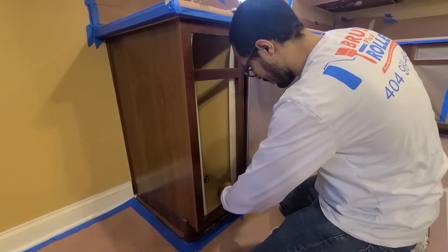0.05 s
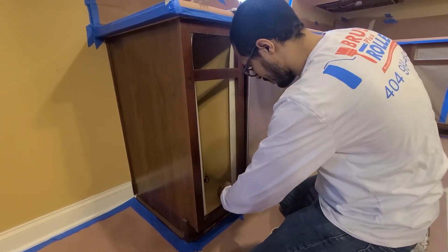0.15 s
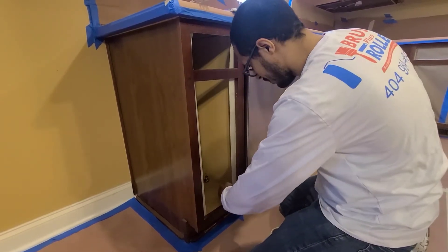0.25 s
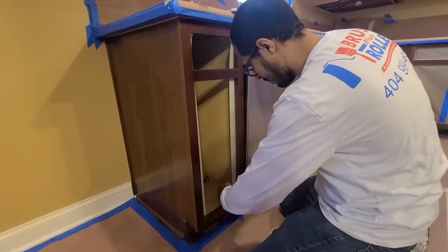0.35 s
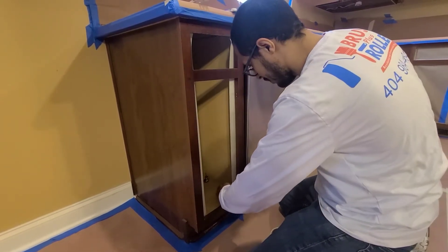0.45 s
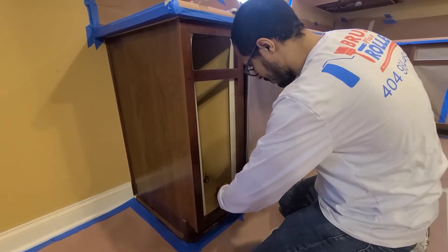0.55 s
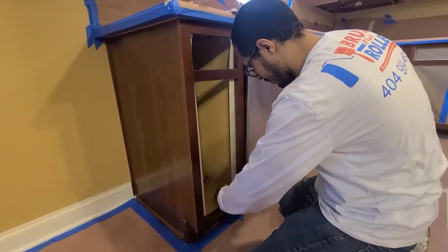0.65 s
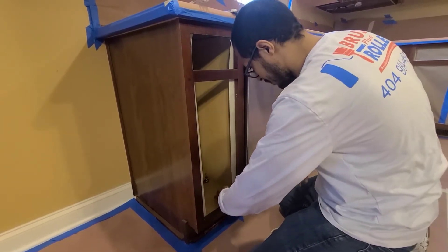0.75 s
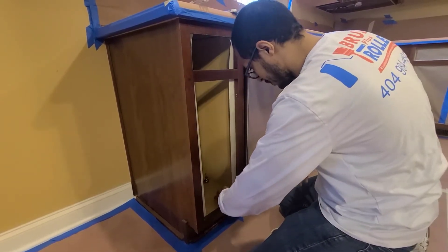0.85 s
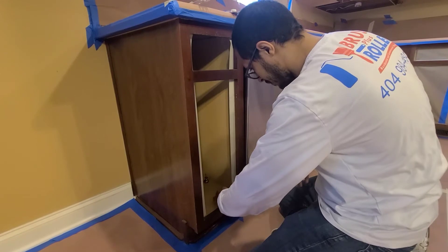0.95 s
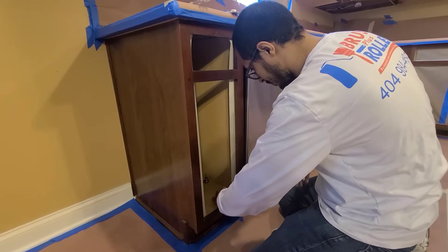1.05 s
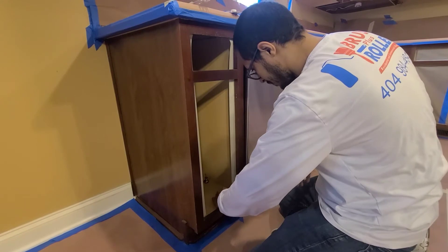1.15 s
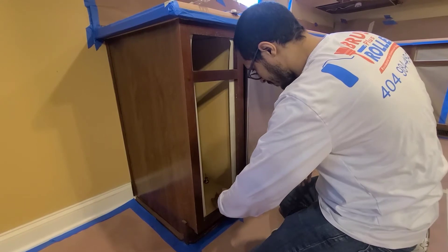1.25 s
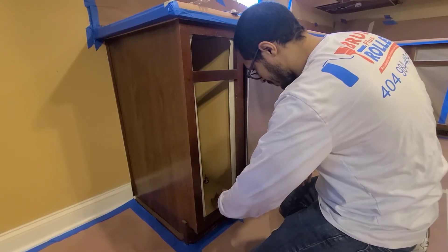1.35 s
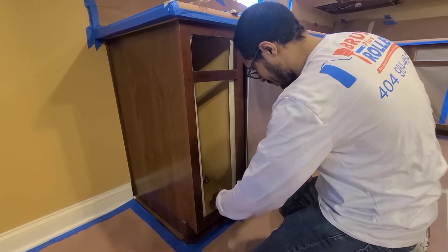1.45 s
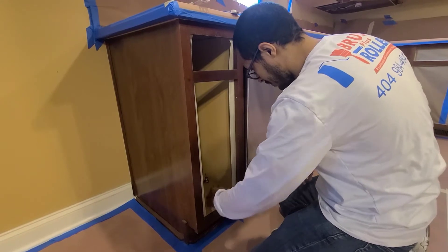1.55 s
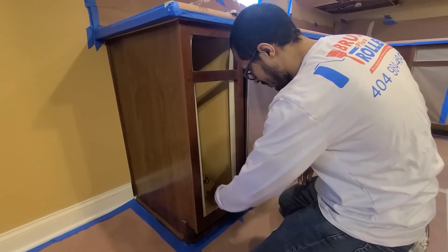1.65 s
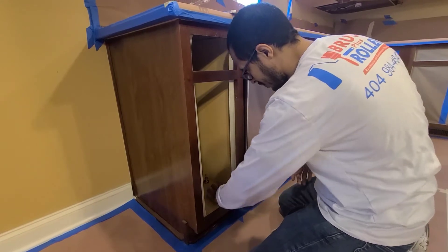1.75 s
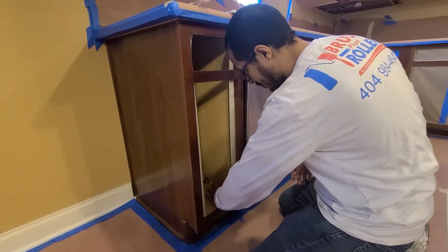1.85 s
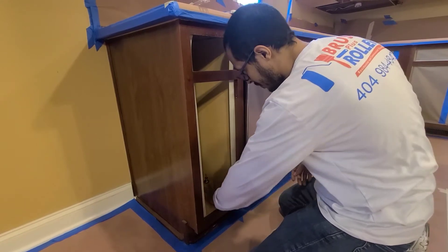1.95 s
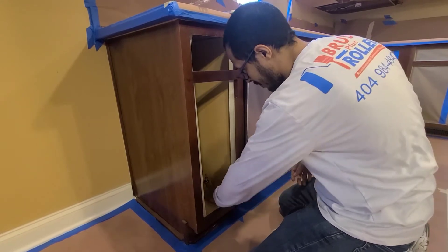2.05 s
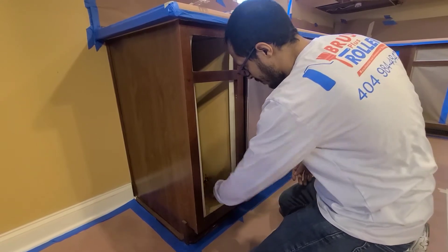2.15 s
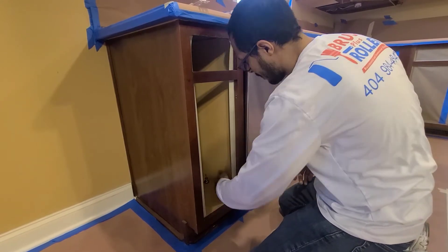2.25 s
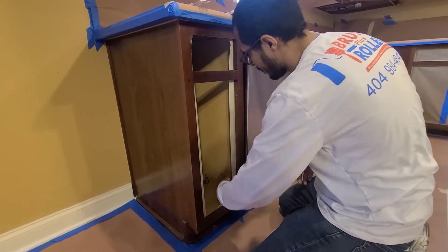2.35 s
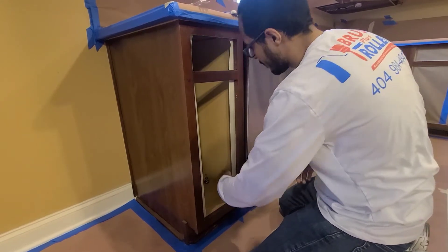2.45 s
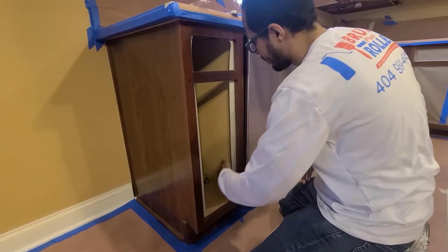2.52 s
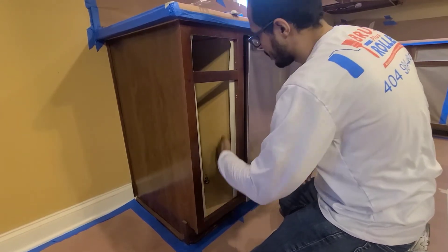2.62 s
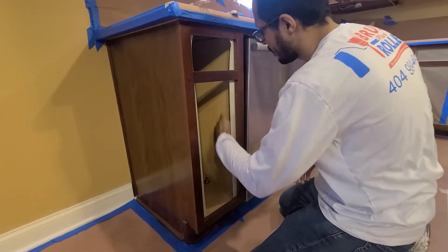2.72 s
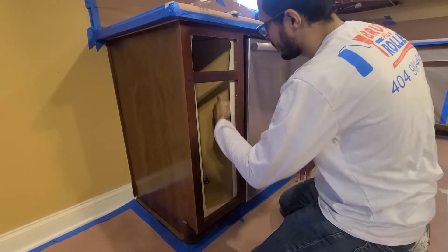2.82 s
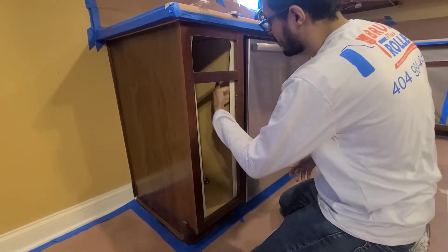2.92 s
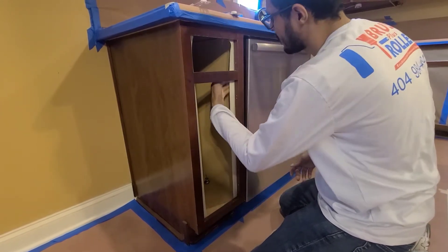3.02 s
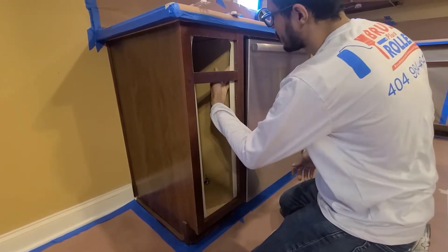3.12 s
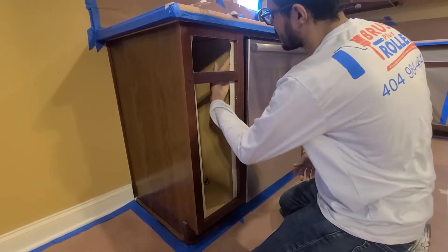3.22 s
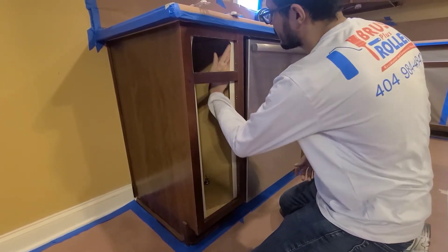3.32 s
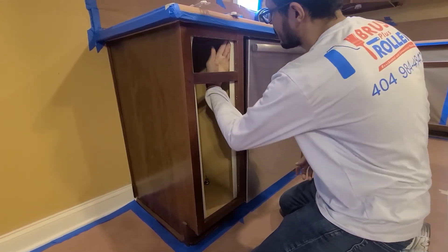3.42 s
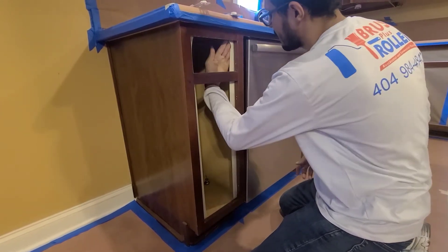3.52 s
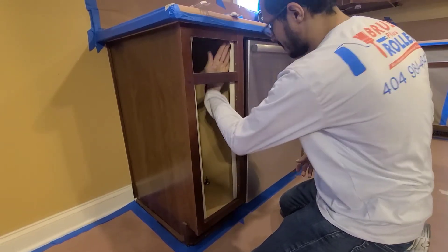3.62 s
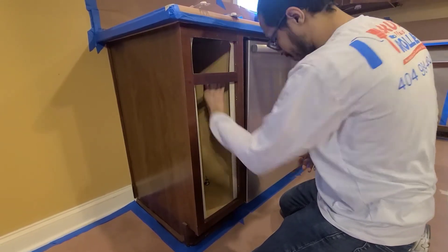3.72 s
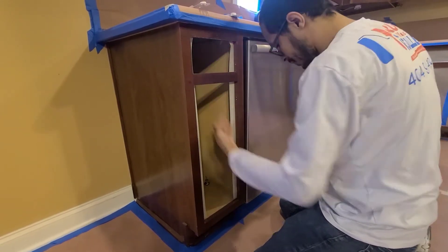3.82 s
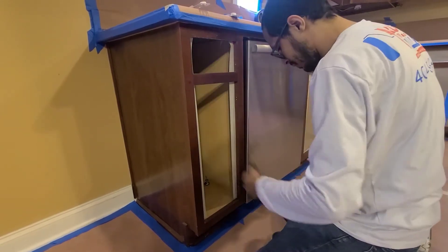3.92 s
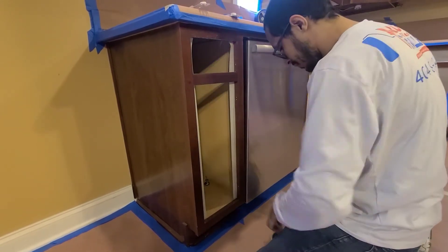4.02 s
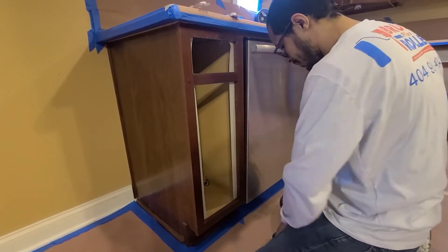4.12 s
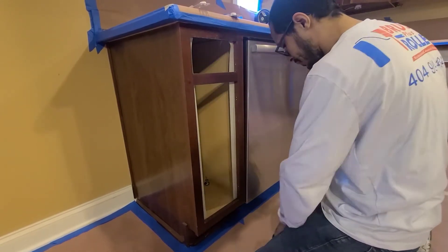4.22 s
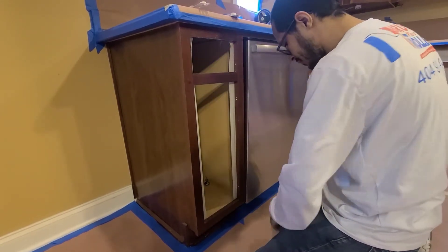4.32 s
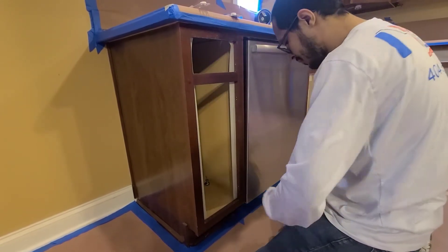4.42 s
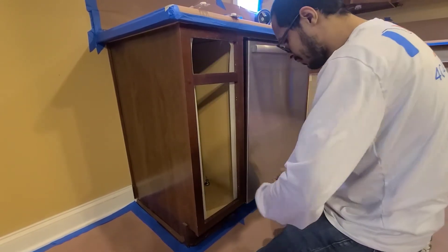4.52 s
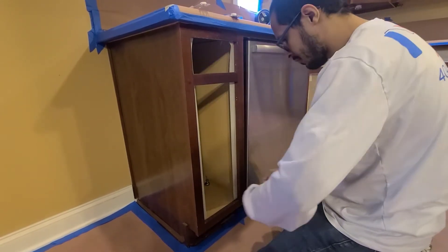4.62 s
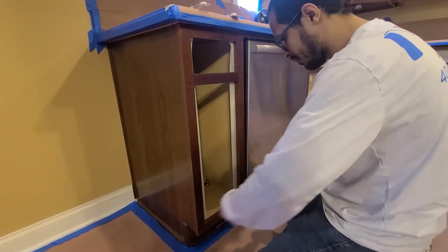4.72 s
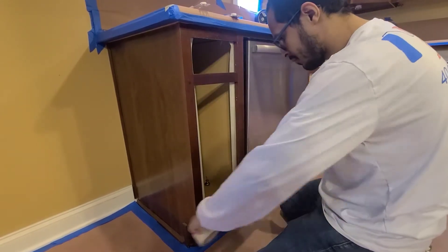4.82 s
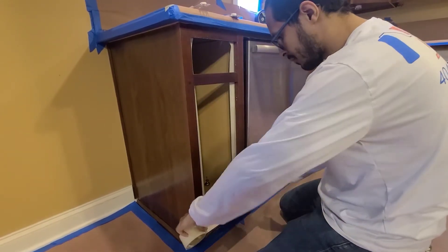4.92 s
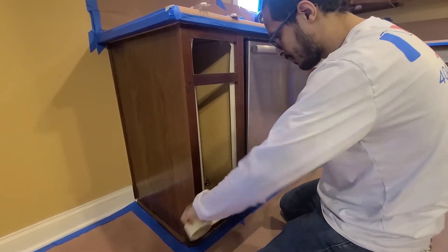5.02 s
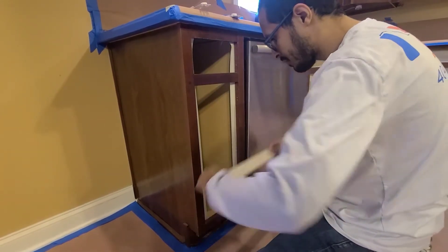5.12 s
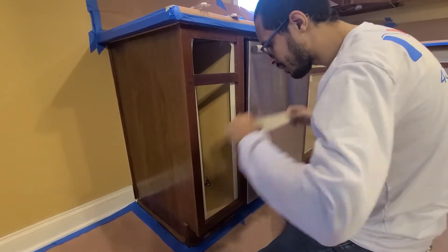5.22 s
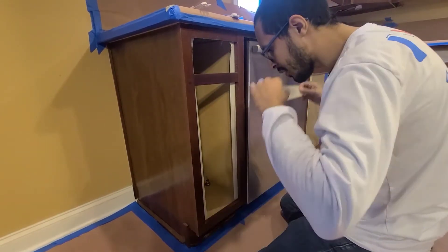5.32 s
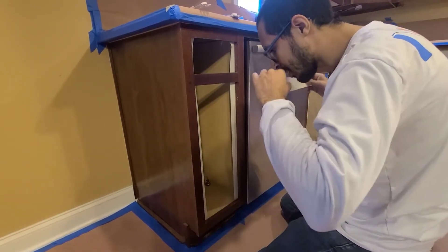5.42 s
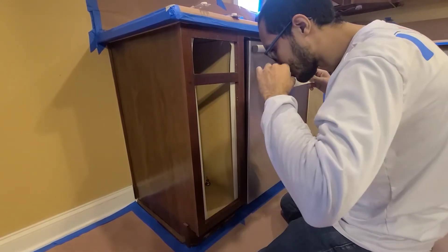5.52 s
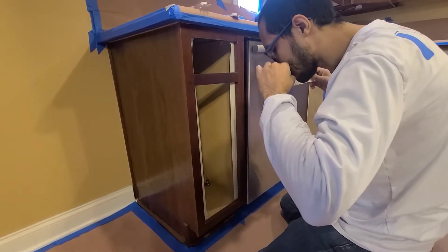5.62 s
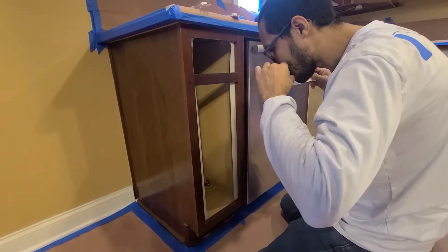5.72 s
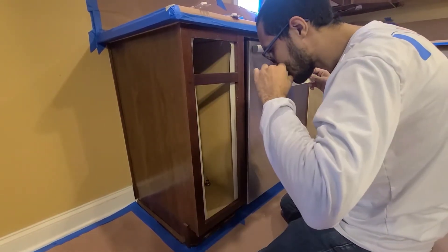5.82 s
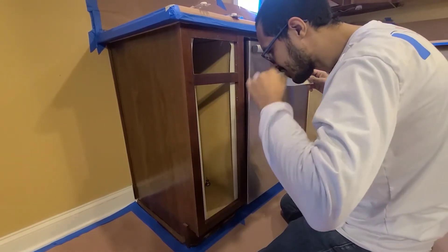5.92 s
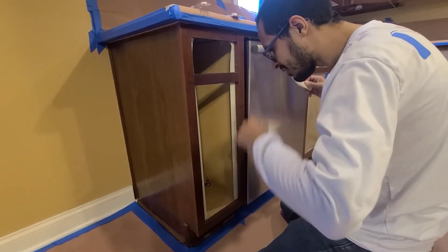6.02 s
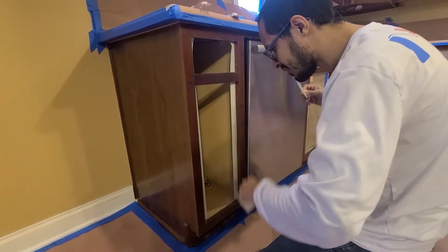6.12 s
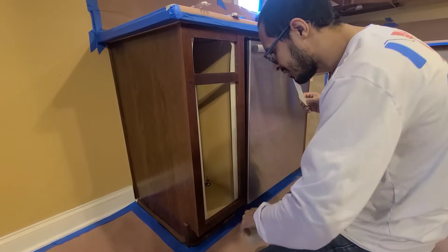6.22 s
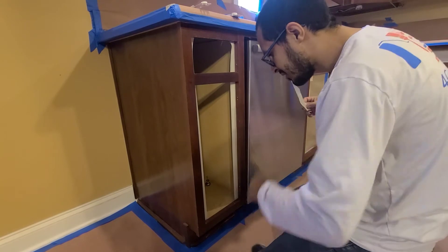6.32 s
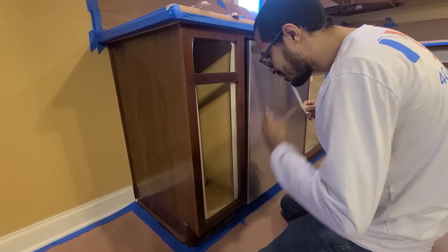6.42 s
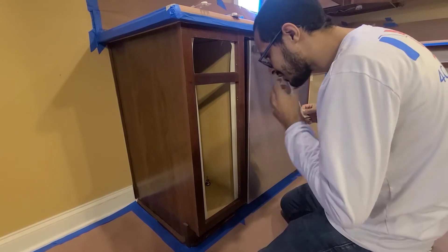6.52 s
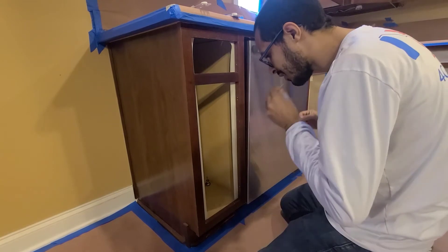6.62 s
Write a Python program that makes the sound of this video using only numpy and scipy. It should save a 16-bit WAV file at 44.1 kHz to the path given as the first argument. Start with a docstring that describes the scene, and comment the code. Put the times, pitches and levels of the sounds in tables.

```python
"""Masking tape is pulled off its roll and torn: uneven stick-slip clicks, each a short scrape, shake the strip.
Before that a kneeling painter presses and smooths tape inside a wooden cabinet: grainy friction noise, gliding
squeaks, bright snaps and dull thuds of decaying noise. At the end the roll drops on a papered floor and bounces:
ringing modes, a paper slap and a floor thump. The bare room echoes by convolution with decaying noise;
a machine hums behind a wall as two wavering tones in faint air noise."""
import sys
import numpy as np
from scipy import signal
from scipy.fft import rfft, irfft, next_fast_len
from scipy.io import wavfile
from scipy.ndimage import uniform_filter1d, minimum_filter1d, map_coordinates

SR = 44100
rng = np.random.default_rng(int(sys.argv[2]) if len(sys.argv) > 2 else 0)


def how_loud(loudness_db):
    """Turn decibels into a plain amplitude multiplier (0 dB gives 1, 20 dB gives 10)."""
    steps = np.asarray(loudness_db, float) / 20
    return 10 ** steps


def unload_audio(sound):
    """Save the sound as a 16-bit wav file, at the path given as the first command line argument."""
    columns = np.transpose(np.atleast_2d(sound))
    # keep every value between -1 and 1, then stretch to whole-number steps
    steps = np.round(np.clip(columns, -1, 1) * 32767)
    wavfile.write(sys.argv[1], SR, steps.astype(np.int16))


N = 293706


def unit(x):
    """Normalization: scales to rms 1."""
    return x / np.sqrt(np.mean(x ** 2) + 1e-20)


def along(points, hz):
    """Logarithmic frequency scale: interpolates (f/Hz, value) points."""
    f, v = np.transpose(points)
    return np.interp(np.log(hz + 1), np.log(f + 1), v)


def curves(rows):
    """Piecewise-linear envelopes: a 0/1 gate with soft edges, open while the rows last, then each column."""
    s, *cols = np.transpose(rows)
    t = np.arange(N) / SR
    is_open = 1. * (t >= s[0]) * (t <= s[-1])
    gate = uniform_filter1d(is_open, size=200, mode="nearest")
    return [gate] + [np.interp(t, s, c) for c in cols]


def wobble(rate):
    """Slow random modulation: a spline through random knots, rate of them a second."""
    return map_coordinates(rng.standard_normal(size=2048), [np.arange(N) * rate / SR])


def coloured(x, points):
    """Minimum-phase filtering: a causal response of energy 1, from the cepstrum of (f/Hz, level/dB) points."""
    half = next_fast_len(N // 2 + 8192)
    hz = np.fft.rfftfreq(2 * half, 1 / SR)
    gain = how_loud(np.maximum(along(points, hz), -90))
    cepstrum = irfft(np.log(unit(gain)), 2 * half)
    # folding the negative times onto the positive ones makes the response causal
    cepstrum[1:half] *= 2
    cepstrum[half + 1:] = 0
    response = np.exp(rfft(cepstrum))
    return irfft(rfft(x, 2 * half) * response, 2 * half)[..., :N]


# coherence of the diffuse sound: f/Hz, left-right likeness/1
LIKENESS = [(60, 0.86), (290, 0.91), (640, 0.43), (1400, 0), (3100, 0), (7000, 0)]


def spread(pair):
    """Diffuse-field coherence: mixes two unrelated signals to agree in the bass and differ in the treble."""
    n = pair.shape[1]
    likeness = np.clip(along(LIKENESS, np.fft.rfftfreq(n, 1 / SR)), 0, 1)
    turn = np.arccos(likeness) / 2
    mid, side = rfft(pair) * [np.cos(turn), np.sin(turn)]
    return irfft(np.array([mid + side, mid - side]), n)


def slips(rate, scatter, size_db):
    """Stick-slip: a click of random size whenever the running rate passes a scattered whole number."""
    draw = rng.standard_normal((N // 16, 2))
    turns = np.arange(len(draw)) + scatter * draw[:, 0]
    at = np.searchsorted(np.cumsum(rate) / SR, turns)
    size = unit(how_loud(size_db * np.clip(draw[:, 1], -2, 2)))
    clicks = np.bincount(at, size, N + 1)[:N]
    return clicks * np.sqrt(SR / np.maximum(rate, 1))  # mean power 1 at any rate


# reverberation of the bare room, before the early scatter is added: f/Hz, t60/s
ECHO_DECAY = [(100, 0.61), (500, 0.51), (1500, 0.57), (4000, 0.46), (8000, 0.38), (15000, 0.25)]
# spectrum of the room's answer, before each source's wet level: f/Hz, level/dB
ECHO_SPECTRUM = [(100, 0), (400, -3.5), (1500, -1.5), (5000, -1), (8000, -6), (15000, -6)]


def room(x, wet_db, close):
    """Reverberation: bare walls answer as frequency-dependent decay; close surfaces add an early scatter."""
    hz, t, z = signal.stft(rng.standard_normal((2, SR)), SR, nperseg=256)
    decay = how_loud(-60 * t / along(ECHO_DECAY, hz)[:, None])
    tail = spread(signal.istft(z * decay, SR, nperseg=256)[1][:, :SR])
    t = np.arange(SR) / SR
    onset = 1 - np.exp(-t / 0.0008)
    early = 1 + close * np.exp(-t / 0.0082)
    z = rfft(tail * onset * early)
    # many surfaces: no band stands out
    even = np.sqrt(uniform_filter1d(np.abs(z) ** 2, size=150, axis=1))
    # one second of tail, so the bins are 1 Hz apart; the left answer is slightly the stronger
    level_db = along(ECHO_SPECTRUM, np.arange(z.shape[1])) + [[.4], [-.4]]
    tail = irfft(z / even * how_loud(level_db), SR)[:, :SR * 3 // 4]
    return how_loud(wet_db) * signal.fftconvolve(x[None], tail, axes=1)[:, :N]


def placed(x, pan_db, lag, wet_db, close):
    """Interchannel differences: direct sound, left louder by pan_db and late by lag samples, plus the room."""
    direct = np.array([np.roll(x, lag) * how_loud(pan_db / 2), x * how_loud(-pan_db / 2)])
    room_tilt = how_loud(np.array([[pan_db], [-pan_db]]) / 4)
    return direct + room(x, wet_db, close) * room_tilt


# machine behind the wall: f/Hz, rms level/dB
HUM_TONES = [(57, -52.5), (163.5, -65)]
# room air: f/Hz, relative density/dB
AIR_SPECTRUM = [(20, -29.5), (40, -2.5), (70, 2), (114, -10), (250, -9), (416, -14.5), (911, -23.5),
                (1160, -16), (1370, -21.5), (3720, -31), (6050, -39.5), (7310, -58.5), (11300, -50),
                (16000, -61)]


def background():
    """Amplitude and phase modulation: steady tones waver as a machine hum in filtered-noise room air."""
    t = np.arange(N) / SR
    hum = 0
    for hz, db in HUM_TONES:
        level = np.sqrt(2) * how_loud(db + 0.38 * wobble(11))
        hum = hum + level * np.sin(2 * np.pi * hz * t + .3 * wobble(4.8))
    air = spread(coloured(rng.standard_normal((2, N)), AIR_SPECTRUM))
    return hum * how_loud([[-.4], [.4]]) + how_loud(-54.5 + 1.5 * wobble(4.7)) * air


# short strokes on tape, paper and cloth: peak t/s, rise/s, fall/s, rustle level/dB, treble over rustle/dB
HAND_STROKES = [(0.0, .01, 0.32, -51, -20), (0.125, 0.076, 0.072, -70, -16), (0.29, 0.031, 0.35, -67, -36),
                (0.584, 0.048, 0.044, -56, -18), (1.215, 0.08, 0.043, -70, -20),
                (1.449, 0.19, 0.048, -61, -26), (1.636, 0.011, 0.017, -58.5, -40),
                (1.696, 0.038, 0.14, -65.5, -34), (1.87, 0.071, 0.12, -63.5, -30),
                (1.914, 0.066, .1, -55, -10), (2.0, .1, 0.15, -76, -8), (2.27, 0.017, 0.031, -68, -38),
                (3.511, 0.084, 0.026, -59, -19), (4.115, 0.052, 0.11, -60.5, -19),
                (4.23, 0.11, .2, -69.5, -15.5), (4.498, 0.017, 0.02, -56.5, -17),
                (4.61, .05, 0.018, -69.5, -15), (5.1, .1, 0.22, -68.5, -32),
                (5.78, 0.019, 0.039, -56, -2.5), (5.84, 0.028, .01, -65, 8), (6.1, .1, 0.063, -75, -33),
                (6.242, 0.035, 0.013, -55, -28)]
# a long wipe up the inside of the cabinet:
# t/s, rustle level/dB, treble over rustle/dB, hollow cabinet over rustle/dB
LONG_WIPE = [(2.38, -79, -40, 18), (2.44, -53.5, -17, -23), (2.6, -55.5, -13, 1), (2.685, -53.5, -8.5, -9),
             (2.72, -44, -3.5, -5.5), (2.8, -48, -5, -12.5), (2.835, -67, -10, 10), (2.9, -70, 2, 7),
             (2.93, -72, -28, 12), (2.978, -58.5, -20, -1), (3.13, -66, -17, -14.5), (3.33, -60, -10, 1.5),
             (3.43, -81, -19, 3)]
# rubbed paper, its fine treble and the hollow cabinet: f/Hz, relative density/dB
PAPER_SPECTRUM = [(470, -22), (800, -1), (1230, 3), (1540, 2.5), (1910, 0), (2220, -3), (3680, 0.5),
                  (5720, -8), (6600, -11.5), (7500, -33), (9750, -62.5), (16500, -120)]
SHEEN_SPECTRUM = [(4410, -32.5), (7500, -7), (10300, -2.5), (11700, 1), (15200, -1), (16000, -9.5)]
HOLLOW_SPECTRUM = [(70, -32.5), (100, 6), (250, 8), (700, 8), (1200, -11.5), (1800, -52)]


def hands():
    """Sliding friction: clumped grains on a hiss, heard as paper, fine treble and the hollow box behind."""
    fade_db = 29  # a stroke's change of level over its rise and over its fall
    stroke_hollow_db = -4  # hollow cabinet over the rustle
    shuffle_db, shuffle_hollow_db = -87.5, -73  # faint movement of clothes throughout
    t = np.arange(N) / SR
    strokes = strokes_treble = 0
    for s, rise, fall, db, treble_db in HAND_STROKES:
        swell = how_loud(db - fade_db * np.maximum((s - t) / rise, (t - s) / fall))
        strokes = strokes + swell
        strokes_treble = strokes_treble + swell * how_loud(treble_db)
    gate, wipe_db, wipe_treble_db, wipe_hollow_db = curves(LONG_WIPE)
    wipe = gate * how_loud(wipe_db)
    paper = strokes + wipe + how_loud(shuffle_db)
    sheen = strokes_treble + wipe * how_loud(wipe_treble_db)
    hollow = strokes * how_loud(stroke_hollow_db) + wipe * how_loud(wipe_hollow_db) + how_loud(shuffle_hollow_db)
    clumps = how_loud(3.2 * wobble(40))  # shared by the three layers

    def rub():
        """Granular noise: irregular slips over a hiss."""
        grains = slips(900 * how_loud(4 * wobble(25)), scatter=1.1, size_db=0.5)
        return clumps * (.5 * grains + 0.78 * rng.standard_normal(N))

    rustle = coloured(paper * rub(), PAPER_SPECTRUM)
    treble = coloured(sheen * rub(), SHEEN_SPECTRUM)
    return rustle + treble + coloured(hollow * rub(), HOLLOW_SPECTRUM)


# fingertips on the varnish: start t/s, length/s, starting f/Hz, glide/(Hz/s), level/dB
FINGER_SQUEAKS = [(0.0, .14, 3254, -400, -56), (0.192, 0.092, 1984, 100, -51), (0.29, .11, 2060, -100, -76),
                  (0.485, .06, 4430, -500, -68), (0.0, 0.174, 4280, 0.1, -66),
                  (1.857, 0.206, 3860, -1000, -70), (2.301, 0.11, 2020, -5500, -62.5),
                  (2.334, 0.061, 2530, -3500, -65), (2.401, 0.11, 2080, -700, -54)]


def squeaks():
    """Frequency modulation: slightly unsteady, fluttering tones glide in pitch, each with its octave."""
    edge_s, octave_db = 0.013, -20.5  # fade in and out; overtone relative to the tone
    out, t = np.zeros(N), np.arange(N) / SR
    for s, length, hz, glide, db in FINGER_SQUEAKS:
        held = np.clip(np.minimum(t - s, s + length - t) / edge_s, 0, 1)
        pitch = hz + glide * np.clip(t - s, 0, length)
        phase = 2 * np.pi * np.cumsum(pitch * (1 + 0.013 * wobble(200))) / SR
        tone = np.sin(phase) + how_loud(octave_db) * np.sin(2 * phase)
        out += held * how_loud(db + 1.07 * wobble(80)) * tone
    return out


def puff(t, hz, width, t60):
    """Damped band noise: a dying burst around hz (width in octaves), peak 1."""
    f = np.fft.rfftfreq(len(t), 1 / SR) + 1
    band = 1 + (np.log2(f / hz) / width) ** 4
    noise = irfft(rfft(rng.standard_normal(len(t))) / band, len(t))
    burst = noise * how_loud(-60 * t / t60) * (1 - np.exp(-t * hz * 3))
    return burst / np.abs(burst).max()


# single snaps of glue and paper: t/s, peak level/dB, centre f/Hz, treble over peak/dB, body t60/s
GLUE_SNAPS = [(0.071, -34, 3000, -32, 0.0081), (0.175, -47, 3300, -33, 0.012),
              (0.4022, -41, 1080, -16, 0.036), (0.4459, -32.5, 1540, -22, 0.0033),
              (0.5832, -47, 3070, -33, 0.013), (1.2205, -45.5, 1610, -9, 0.028),
              (1.637, -53, 1640, -36, 0.025), (1.6763, -45, 1650, -39, 0.021),
              (1.694, -45, 1480, -31, 0.018), (2.231, -37.5, 1710, -45, 0.035),
              (2.7327, -41, 1080, -8, 0.012), (2.766, -29.5, 3820, -15, 0.051),
              (2.7894, -34, 1300, -13, 0.0091), (3.506, -47, 3100, -31, 0.022),
              (4.0956, -39, 2010, -32, 0.01), (4.1478, -50.5, 1090, -26, 0.0043),
              (4.4267, -51, 1225, -18, 0.012), (4.437, -36, 2883, -12, 0.0072),
              (4.4853, -29.5, 5400, -11.5, 0.052), (4.496, -44, 5660, -13, 0.019),
              (4.6146, -36.5, 6130, -25, 0.032), (4.6337, -24.5, 3510, -20, 0.014),
              (5.6523, -29, 2700, -12, 0.012), (5.741, -23, 2926, -17, 0.0059),
              (5.7844, -51, 3060, -9, 0.018), (6.4879, -33.5, 1270, -26, 0.0082),
              (6.5494, -35.5, 1140, -13, 0.0093)]
# knuckles and knees on wood and floor: t/s, peak level/dB, centre f/Hz, t60/s
BODY_THUDS = [(2.229, -34, 494, 0.2), (2.245, -39, 114, 0.15), (2.28, -37, 132, 0.067), (2.53, -44, 84, .1),
              (3.095, -44, 163, 0.23), (3.701, -46.5, 85, 0.056), (4.094, -31.5, 287, 0.12),
              (4.149, -35.5, 333, 0.078), (4.227, -45.5, 86.6, 0.081)]


def contacts():
    """Impact excitation: snaps are short bright bursts, thuds mostly longer dull ones."""
    out, t = np.zeros(N + SR), np.arange(SR // 2) / SR
    for s, db, hz, treble_db, t60 in GLUE_SNAPS:
        body = puff(t, hz, 1.024, t60)
        treble = how_loud(treble_db) * puff(t, 14000, .4, t60 * 0.9)
        out[round(s * SR):][:len(t)] += how_loud(db) * (body + treble)
    for s, db, hz, t60 in BODY_THUDS:
        out[round(s * SR):][:len(t)] += how_loud(db) * puff(t, hz, 0.89, t60)
    return out[:N]


def peel(rows, pace, spectrum, strip, size_db, hiss):
    """Stick-slip: glue lets go in uneven slips, each a short scrape, over a hiss; they shake the taut strip."""
    gate, level_db, flap_db = curves(rows)
    first, last, settle_s = pace  # slips per second at the start and in the end; time constant
    elapsed = np.maximum(np.arange(N) / SR - rows[0][0], 0)
    rate = last - (last - first) * np.exp(-elapsed / settle_s)
    clicks = slips(gate * rate, scatter=.3, size_db=size_db)
    scrape = how_loud(-60 * np.arange(512) / SR / 0.004)
    scrape /= np.linalg.norm(scrape)
    force = np.convolve(clicks, scrape)[:N] * rng.standard_normal(N)
    force += hiss * rng.standard_normal(N)
    force *= gate * how_loud(level_db + 2.54 * wobble(70)) / np.sqrt(1 + hiss ** 2)
    flap = force * how_loud(flap_db + 2.6 * wobble(70))
    return coloured(force, spectrum) + coloured(flap, strip)


# the strip peels off the roll: t/s, crackle level/dB, flap of the taut strip over crackle/dB
PULLED_STRIP = [(4.636, -36.5, -25), (4.654, -26.5, -10), (4.68, -33.5, -5.5), (4.694, -23.5, -8),
                (4.712, -26.5, -6), (4.728, -17, -9), (4.745, -23, -20.5), (4.8, -25.5, -10.5),
                (4.82, -26.5, -13.5), (4.842, -33, -3.5), (4.862, -38, -8)]
# crackling glue, then the long flapping strip: f/Hz, relative density/dB
GLUE_SPECTRUM = [(400, -44.5), (800, -13), (1100, -5.5), (1640, -5), (2400, -8), (2990, -3), (4150, -4.5),
                 (5200, -7), (6480, -6), (7290, -17), (9500, -16.5), (12000, -16), (16000, -15.5)]
LONG_STRIP_SPECTRUM = [(100, -24.5), (220, -7), (330, -2.5), (620, 3), (850, -6.5), (1400, -23.5)]


def pull():
    """Stick-slip peeling: the slips quicken as the peel gets going and shake a long strip."""
    pace = (400, 1200, .07)
    return peel(PULLED_STRIP, pace, GLUE_SPECTRUM, LONG_STRIP_SPECTRUM, size_db=0, hiss=0.31)


# the strip is torn: t/s, crackle level/dB, flap of the taut strip over crackle/dB
TORN_STRIP = [(5.843, -53, -13), (5.858, -36.5, -2.5), (5.875, -27.5, -14), (5.89, -20, -4.5),
              (5.904, -24.5, -12), (5.909, -30.5, -3), (5.93, -30.5, -8), (5.942, -26, -11),
              (5.946, -36, -18)]
# ripping paper, then the short end at the tear: f/Hz, relative density/dB
RIP_SPECTRUM = [(700, -35.5), (1200, -17), (1640, -2), (2390, -13.5), (2990, -5.5), (4300, -7), (6480, -12),
                (7590, -36.5), (8500, -32), (11700, -19), (16000, -19)]
SHORT_END_SPECTRUM = [(250, -27), (500, -8.5), (800, -2.5), (1120, 2.5), (1400, -14), (2200, -23)]


def tear():
    """Stick-slip tearing: faster slips of more uneven size shake a short end."""
    pace = (900, 1500, 0.023)
    return peel(TORN_STRIP, pace, RIP_SPECTRUM, SHORT_END_SPECTRUM, size_db=6.5, hiss=0.38)


# the roll lands and bounces: t/s, ring peak level/dB, hardness (contact passes sound up to f/Hz), slap level/dB
LANDINGS = [(6.258, 3, 1420, 1), (6.2833, 4, 2540, 9.5), (6.298, -30, 3000, -17)]
# modes of the cardboard core: f/Hz, relative level/dB, t60/s
CORE_MODES = [(745, -1.5, 0.0033), (1039, -3.5, 0.017), (1300, -1.5, 0.003), (1718, 5.5, 0.0009),
              (2076, -0.5, 0.005), (2490, -6.5, 0.0014)]
# slapped paper, then the thumped floor: f/Hz, relative density/dB
SLAP_SPECTRUM = [(600, -27), (1500, -3.5), (2500, 3), (3500, -0.5), (4800, -12), (6000, -23), (7000, -30),
                 (9000, -39), (16000, -46)]
THUMP_SPECTRUM = [(50, -26), (80, -4), (160, -4.5), (240, -2), (400, 0.5), (600, -6.5), (900, -51.5)]


def roll():
    """Modal excitation: landings ring the dead core, soft ones fewer high modes, slap paper and thump the floor."""
    crumple_db, thump_db = -20, 2.5  # paper noise relative to the slap; floor thump over the landing
    out, slaps, blows = np.zeros(N + SR), np.zeros(N + SR), np.zeros(N)
    t = np.arange(SR // 2) / SR
    free = np.maximum(t - .003, 0)  # driven while it rocks on the floor, the core dies away only afterwards
    for s, db, hard_hz, slap_db in LANDINGS:
        start = round(s * SR)
        ring = 0
        for k, (hz, level, t60) in enumerate(CORE_MODES):
            decay = how_loud(level + rng.normal(0, 1) - 60 * free / t60)
            passed = 1 / (1 + (hz / hard_hz) ** 4)
            ring = ring + (-1) ** k * decay * passed * np.sin(2 * np.pi * hz * t)
        ring *= 1 - np.exp(-(t * hard_hz * 1.2) ** 2)  # the contact takes time to build
        out[start:][:len(t)] -= how_loud(db) * ring / np.abs(ring).max()
        crumple = how_loud(slap_db + crumple_db - 60 * t / 0.0049) * rng.standard_normal(len(t))
        slaps[start:][:len(t)] += crumple
        slaps[start] += how_loud(slap_db)
        blows[start] = how_loud(db + thump_db)
    return out[:N] + coloured(slaps[:N], SLAP_SPECTRUM) + coloured(blows, THUMP_SPECTRUM)


def scene():
    """Superposition: all sources add, each at its place in the room."""
    rubbing = placed(hands() + squeaks(), pan_db=-5.0, lag=-1, wet_db=5.5, close=2.4)
    touches = placed(contacts(), pan_db=-1.8, lag=-2, wet_db=3, close=3)
    pulling = placed(pull(), pan_db=0.63, lag=1, wet_db=4, close=3.9)
    tearing = placed(tear(), pan_db=-4.5, lag=1, wet_db=1.0, close=3.45)
    landing = placed(roll(), pan_db=-2.8, lag=-3, wet_db=1.1, close=1.0)
    return background() + rubbing + touches + pulling + tearing + landing


def low_pass(x):
    """Removes everything above the highest recorded frequency."""
    return signal.sosfilt(signal.butter(12, 16460, fs=SR, output="sos"), x)


def record(dry):
    """Peak limiting and band limiting: the highest peaks are ducked and the top of the spectrum is cut."""
    top_hz = 15900
    need = np.minimum(1, .96 / (np.abs(dry).max(axis=0) + 1e-9))
    gain = uniform_filter1d(minimum_filter1d(need, size=89), size=44)  # held about 2 ms, smoothed over 1 ms
    fade = np.clip((top_hz - np.fft.rfftfreq(N, 1 / SR)) / 150, 0, 1)
    mix = irfft(rfft(dry * gain) * fade ** 2, N)
    return low_pass(mix)


dry = scene()
out = record(dry)
unload_audio(out)
```